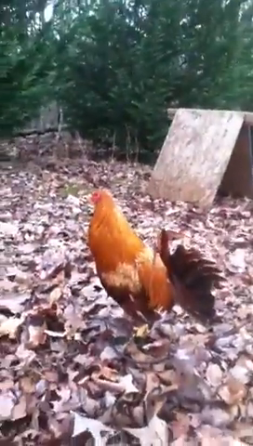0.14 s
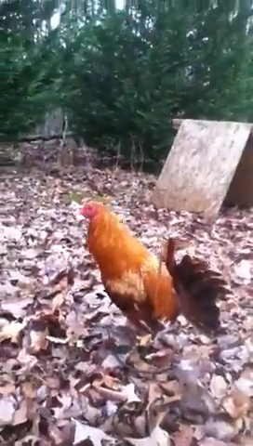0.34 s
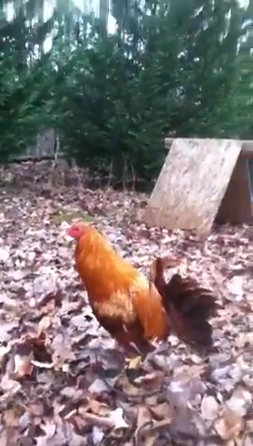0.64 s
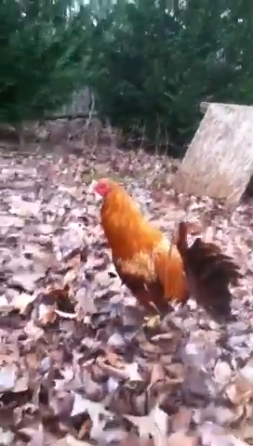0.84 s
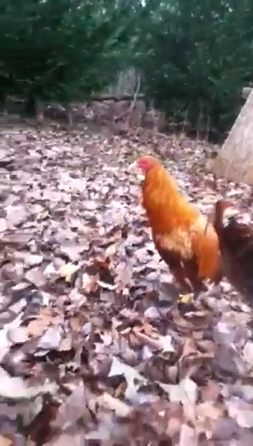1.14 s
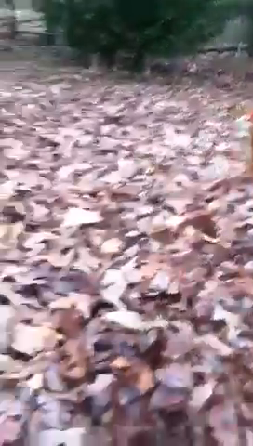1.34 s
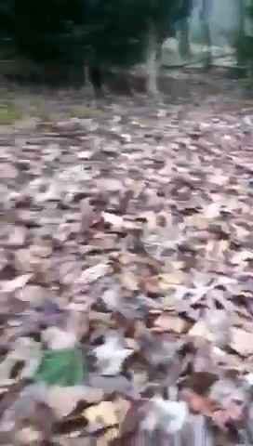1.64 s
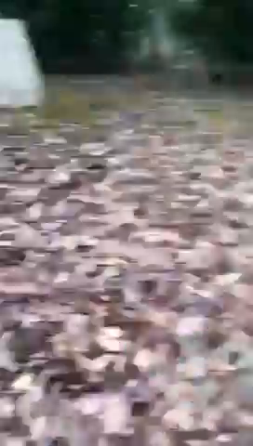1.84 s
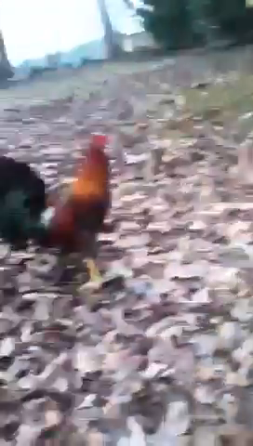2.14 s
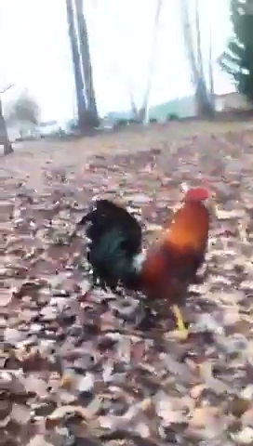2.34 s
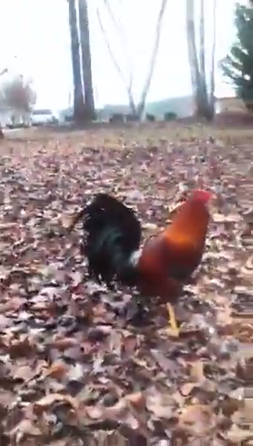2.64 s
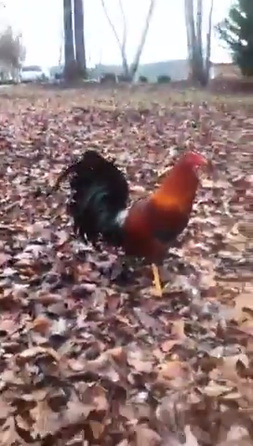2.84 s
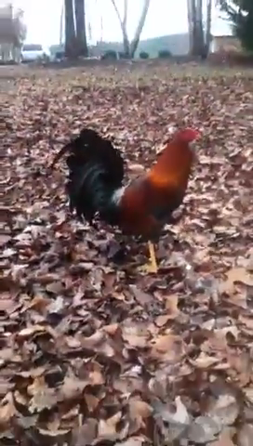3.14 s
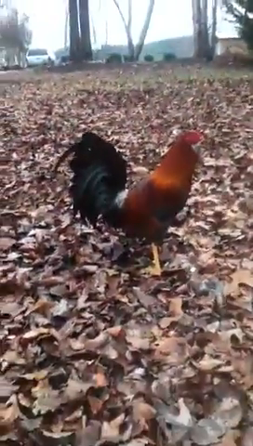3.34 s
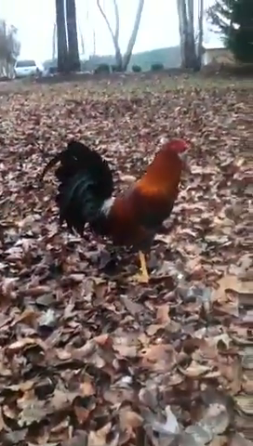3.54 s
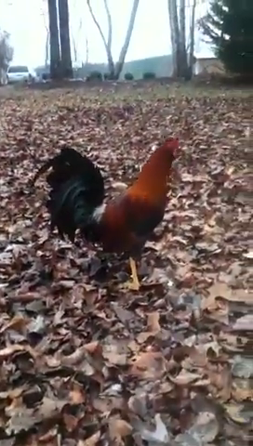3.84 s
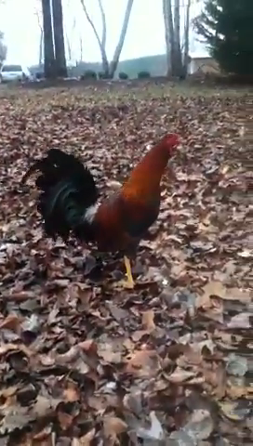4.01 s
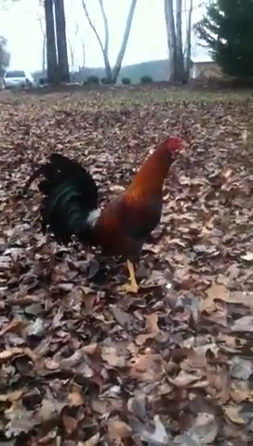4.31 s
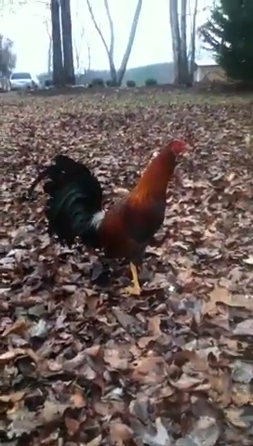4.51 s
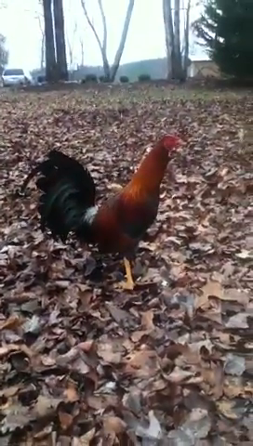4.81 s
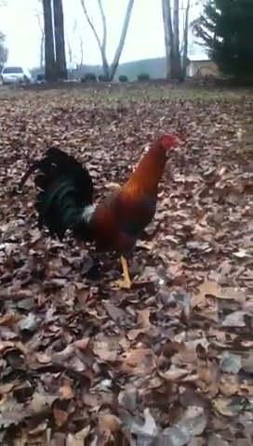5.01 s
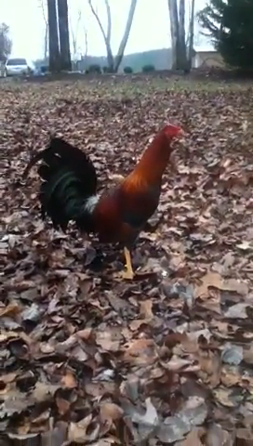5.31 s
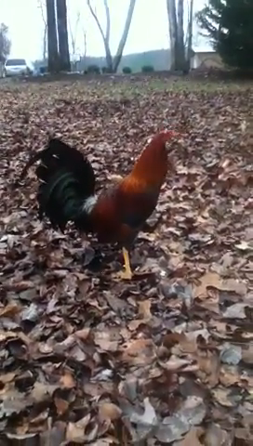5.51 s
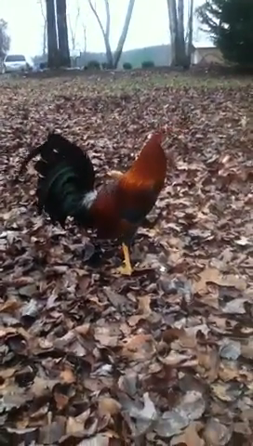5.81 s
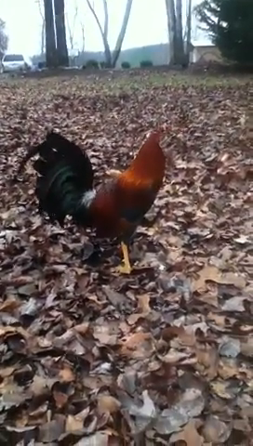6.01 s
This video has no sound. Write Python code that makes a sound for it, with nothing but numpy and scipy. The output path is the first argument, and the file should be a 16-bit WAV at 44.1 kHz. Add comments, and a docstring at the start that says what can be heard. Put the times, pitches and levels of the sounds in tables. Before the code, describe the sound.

A young rooster crows a single time, a couple of metres from a hand-held microphone in a leafy yard. Before the crow come soft, crackly shuffles in dry leaves and some brief handling bumps. The crow is loud and buzzy, four syllables that waver and crack, turning thin and hoarse in between. It leaves a slight echo among the trees over a faint outdoor rumble and hiss.

```python
"""A leafy yard: a young rooster crows once, in four syllables, a couple of metres from a hand-held phone.
His syrinx buzzes loudly, trembles and cracks; between syllables it drops to a thin, hoarse lower
register. Ground and trees return a faint echo. Before the crow, feet shuffle in dry leaves.
Fingers bump the phone now and then, over a low outdoor rumble."""
import sys
import numpy as np
from scipy import signal
from scipy.fft import rfft, irfft
from scipy.io import wavfile
from scipy.ndimage import uniform_filter1d, minimum_filter1d

SR = 44100
rng = np.random.default_rng(int(sys.argv[2]) if len(sys.argv) > 2 else 0)


def output_pcm(signal):
    """Save a mono or channel-first signal as 16-bit PCM at the path in sys.argv[1].

    Samples are clipped to [-1, 1] before scaling.
    """
    pcm = np.clip(np.atleast_2d(signal).T, -1, 1) * 32767
    wavfile.write(sys.argv[1], SR, np.round(pcm).astype(np.int16))


N = 271656
T = np.arange(N) / SR

# loud syllables: (start [s], end [s], top time [s], top pitch [Hz], end pitch [Hz], rise exponent,
#   fall exponent, relative level [dB], swell [dB], surge delay [s], surge [dB], harsh length [s],
#   harsh roughness [0-1], end roughness [0-1], harsh treble [dB], clear treble [dB],
#   clear beak opening [0-1], end beak opening [0-1], 2nd harmonic at start [dB], at end [dB])
SYLLABLES = [(3.754, 3.961, 3.82, 980, 842, 4, 1.5, -8, -.5, .004, 1.5, .118, .13, .33, 6, -5, .55, .3, -1, 0),
             (4.015, 4.136, 4.08, 1045, 855, 1.15, 1.7, -11.5, -2.5, .014, 5.5, .054, .55, .1, 3, 1, .2, .6, 5, -16),
             (4.226, 4.771, 4.53, 993, 880, 12, 1.9, -15, 4.5, .017, 11, .039, .75, .24, 6, 1, .05, .42, -.5, -2),
             (4.968, 5.135, 5.06, 894, 770, 8, 3.6, -18.5, 4, .003, 4, .006, .12, .02, -5, -5.5, .62, .78, 2.5, -4)]
# turbulent air in the throat: (frequency [Hz], density [dB])
RASP = [(200, -32.5), (480, -37.5), (750, 15), (1000, 13), (1450, -5), (2200, -0.5), (3200, -20.5),
        (3850, -13.5), (4400, -30.5), (5200, -28), (6500, -23), (9000, -26.5), (11000, -34.5), (13000, -47),
        (15000, -58.5)]


def undb(db):
    return 10 ** (np.asarray(db) / 20)


def unit(x):
    return x / np.sqrt(np.mean(x ** 2))


def at(spectrum, hz):
    """Read a (frequency [Hz], value) table on a log-frequency axis."""
    table_hz, value = np.transpose(spectrum)
    return np.interp(np.log(np.maximum(hz, 1)), np.log(table_hz), value)


def shape(x, spectrum):
    """Filter x by a (frequency [Hz], gain [dB]) curve."""
    return irfft(rfft(x) * undb(at(spectrum, np.fft.rfftfreq(N, 1 / SR))), N)


def colour(x, spectrum):
    """Filter x, then scale to rms 1."""
    return unit(shape(x, spectrum))


def noise():
    return rng.standard_normal(N)


def wander(rate_hz):
    """Smooth random drift up to about rate_hz; rms 1."""
    lowpass = np.exp(-.5 * (np.fft.rfftfreq(N, 1 / SR) / rate_hz) ** 2)
    return unit(irfft(rfft(noise()) * lowpass, N))


def bell(time_s, width_s):
    return np.exp(-.5 * ((T - time_s) / width_s) ** 2)


def gate(start_s, end_s, rise_s, fall_s):
    return (1 + np.tanh((T - start_s) / rise_s)) * (1 - np.tanh((T - end_s) / fall_s)) / 4


def phase_of(hz):
    return 2 * np.pi * np.cumsum(hz) / SR


def repeat_times(first_s, last_s, spacing_s, slowing=1):
    """Times of a run whose spacing grows by the factor slowing."""
    times = first_s + np.concatenate([[0], np.cumsum(spacing_s * slowing ** np.arange(12))])
    return times[times < last_s + spacing_s / 2]


def yard():
    """Distant low rumble that swells a little, under smooth hiss."""
    # outdoor background: (frequency [Hz], density [dB])
    background = [(15, -57.5), (25, -24), (108, -3), (317, -12.5), (363, -14), (641, -20.5), (695, -19),
                  (887, -18.5), (1290, -23.5), (2000, -25.5), (3720, -28), (5280, -28.5), (12500, -30.5),
                  (16000, -41.5)]
    air = colour(noise(), background)
    rumble = signal.sosfiltfilt(signal.butter(2, 500, fs=SR, output="sos"), air)
    hiss = air - rumble
    swell_db = .44 * wander(1.6) + .93 * wander(9) + 2 * bell(1.4, 1.4)
    return undb(-58.5) * (hiss + rumble * undb(swell_db))


def shuffling():
    """Crunch and hiss envelopes: leaves give way fast underfoot and settle slower, over a faint stir."""
    # foot shuffles: (time [s], length [s], crunch [dB], hiss [dB])
    shuffles = [(0.193, 0.012, -56, -65), (0.741, 0.03, -51.5, -56.5), (0.855, 0.11, -74, -61.5),
                (1.05, 0.04, -83, -58), (1.374, 0.13, -50, -57.5), (1.414, 0.019, -43.5, -67),
                (1.624, .14, -55.5, -59.5), (1.673, 0.02, -51.5, -69), (2.06, 0.17, -68.5, -64),
                (2.421, 0.024, -53, -55), (2.88, 0.17, -67, -81)]
    press_s, settle_s, stir_db = .008, .018, (-67.5, -66)
    power = np.outer(undb(stir_db) ** 2, gate(1.22, 3, rise_s=.25, fall_s=.25))
    for time_s, length_s, *levels_db in shuffles:
        press = (1 + np.tanh((T - time_s) / press_s)) / 2
        settle = np.exp(-np.maximum(T - time_s - length_s, 0) / settle_s)
        power = power + np.outer(undb(levels_db), press * settle) ** 2
    return np.sqrt(power)


def leaves():
    """Crushed leaves crackle in dense tiny snaps."""
    # dull crunch underfoot: (frequency [Hz], density [dB])
    crunch = [(150, -26), (300, 5.5), (500, 3.5), (950, 7), (1500, 4.5), (2200, -1.5), (3200, -22),
              (4900, -23), (6100, -11), (7500, -38), (9000, -38)]
    # crisp hiss on top: (frequency [Hz], density [dB])
    crisp = [(1500, -6), (3000, 2), (4900, -2), (6200, 0), (8000, -3.5), (12000, -9), (16000, -13.5)]
    snaps_per_s, out = 5000, 0
    for envelope, spectrum in zip(shuffling(), [crunch, crisp]):
        snaps = noise() * (rng.random(N) < snaps_per_s / SR)
        snaps *= undb(.29 * np.minimum(rng.exponential(size=N), 5))
        out = out + colour(snaps, spectrum) * envelope * undb(1.4 * wander(47))
    return out


def finger_bumps():
    """A contact tick, then a heavily damped thud of the phone case, falling in pitch."""
    # bumps: (time [s], thud [dB], start pitch [Hz], ring [s], tick [dB])
    bumps = [(0.8627, -11.5, 1300, 0.0019, -28), (1.178, -40.5, 1960, 0.0037, -53),
             (1.3875, -32.5, 1190, 0.004, -47), (2.171, -38.5, 1700, 0.0025, -53),
             (2.351, -43, 1400, .004, -56), (2.442, -37, 2870, 0.001, -56), (2.453, -38, 2490, 0.0022, -45),
             (4.032, -12, 1550, 0.00087, -42)]
    tick = colour(noise(), [(300, 1), (1500, -26), (3500, 4.5), (8000, -4),
                            (11000, -19.5), (15000, -32.5)])
    slowing_s, attack_s, tick_s = .0005, .00025, .00113
    out = 0
    for time_s, thud_db, hz, ring_s, tick_db in bumps:
        t = np.maximum(T - time_s, 0)
        phase = 2 * np.pi * hz * slowing_s * np.log1p(t / slowing_s)
        out = out - undb(thud_db) * np.sin(phase) * np.exp(-t / ring_s) * (1 - np.exp(-t / attack_s))
        out = out + undb(tick_db) * tick * (t > 0) * np.exp(-t / tick_s)
    return out


def echo(call, ground_db, ground_decay_s, trees_db, far_db, far_delay_s):
    """Leafy ground scatters the call at once, trunks return it late, the wood's far edge once more."""
    # echo from the trees: (frequency [Hz], gain [dB])
    tree_gain = [(400, -4.5), (900, -7), (1800, -3.5), (2700, 8.5), (3600, 1.5), (6000, -4.5), (12000, -17)]
    # its decay: (frequency [Hz], T60 [s])
    tree_t60 = [(400, .6), (900, 0.55), (1500, 1.7), (2100, 1.48), (2800, 0.91), (3600, 0.49), (6000, 0.64),
                (12000, .3)]
    ground = colour(noise(), [(500, -6), (900, 2), (3500, 9), (9000, -5)])
    ground *= np.exp(-T / ground_decay_s) * (T > .002)
    white, hz, trees = rfft(noise()), np.fft.rfftfreq(N, 1 / SR), 0
    for centre_hz in 350 * np.sqrt(2) ** np.arange(11):
        half_octave = np.abs(np.log2((hz + 1) / centre_hz)) < .25
        band = irfft(white * half_octave * undb(at(tree_gain, hz)), N)
        trees = trees + band * undb(-60 * T / at(tree_t60, centre_hz))
    trees *= (1 - np.exp(-T / .03)) * (1 + 4.5 * np.exp(-T / .0975))  # soft onset, strong early part
    far = colour(noise(), [(900, -16), (1800, 4), (2100, -9.5), (2800, -6.5), (5000, -31)])
    far *= bell(far_delay_s, .19)
    response = undb(ground_db) * unit(ground) + undb(trees_db) * unit(trees) + undb(far_db) * unit(far)
    return signal.fftconvolve(call, response / np.sqrt(N))[:N]


def hoarse_puffs():
    """Unpitched bursts where the voice gives out; one low gulp before the last syllable."""
    # puffs: (time [s], level [dB], width [s])
    puffs = [(4.785, -31.5, 0.017), (4.881, -24.5, 0.012), (4.925, -28.5, 0.006), (5.139, -32, 0.0052)]
    envelope = sum(undb(db) * bell(time_s, width_s) for time_s, db, width_s in puffs)
    bursts = envelope * colour(noise(), RASP)
    gulp = bell(4.878, .0071) * colour(noise(), [(150, -24), (270, 8), (420, -8), (700, -48)])
    return bursts + undb(-40) * gulp


def soft_register():
    """Soft voice's pitch, level and gate: it droops as the breath slackens, and finally slides away."""
    # break before each syllable:
    # (start pitch [Hz], end pitch [Hz], start level [dB], end level [dB], midway slack [dB])
    breaks = [(590, 640, -19.5, -15, 0), (625, 617, -17.5, -20, 4), (490, 690, -24.5, -19, 16.5),
              (631.4, 650, -23, -18, 18)]
    start_s, slide_s, droop_hz_per_db = 3.734, .024, 4.5
    progress = np.linspace(0, 1, 15)
    segments = []
    for (end_s, next_s, *_), (start_hz, end_hz, start_db, end_db, midway_db) in zip(SYLLABLES, breaks):
        slack_db = midway_db * np.sin(np.pi * progress)
        segments.append([start_s + (end_s - start_s) * progress,
                         start_hz + (end_hz - start_hz) * progress - droop_hz_per_db * slack_db,
                         start_db + (end_db - start_db) * progress - slack_db])
        start_s = next_s
    segments.append([(start_s, start_s + slide_s), (690.5, 409), (-19, -46.5)])  # closing slide
    sounding = sum(gate(times[0], times[-1], rise_s=.00051, fall_s=.0053) for times, _, _ in segments)
    times, hz, db = np.hstack(segments)
    return np.interp(T, times, hz), np.interp(T, times, db), sounding


def soft_voice():
    """Between syllables the membranes flap near 600 Hz; the throat lifts their second harmonic."""
    # throat response: (frequency [Hz], harmonic level [dB])
    throat = [(450, -29.5), (610, -15.5), (850, 4.5), (1220, 0), (1830, -7.5), (2450, -19.5), (3050, -17.5),
              (3700, -23.5), (4400, -38.5), (5200, -48.5), (6500, -42), (10000, -43.5), (13000, -76.5)]
    pitch_hz, level_db, sounding = soft_register()
    phase = phase_of(pitch_hz * (1 + .02 * wander(220)))
    voice = sum(undb(at(throat, k * pitch_hz) + 2 * wander(70)) * np.sin(k * phase)
                for k in range(1, 21))
    return sounding * undb(level_db) * (voice + undb(-13) * colour(noise(), RASP))


def syllable(start_s, end_s, top_s, top_hz, end_hz, rise, fall, base_db, swell_db,
             surge_s, surge_db, harsh_s, harsh_rough, end_rough, harsh_db, clear_db,
             open_clear, open_end, second_start_db, second_end_db):
    """Controls of one arch of pitch: it starts harsh with the beak wide, clears, and frays at its end."""
    # throat resonance under the 2nd harmonic: (frequency [Hz], level re fundamental [dB])
    resonance = [(1580, -23.5), (1700, -9.5), (1770, -4.5), (1850, -1.5), (1980, -1.5), (2080, -9.5)]
    onset_hz, climb_hz_per_s = 809.5, 100
    t = np.clip(T, start_s, end_s)
    progress = (t - start_s) / (end_s - start_s)
    crest_hz = top_hz - climb_hz_per_s * np.maximum(top_s - t, 0)
    scoop_hz = (crest_hz - onset_hz) * np.clip((top_s - t) / (top_s - start_s), 0, 1) ** rise
    drop_hz = (top_hz - end_hz) * np.clip((t - top_s) / (end_s - top_s), 0, 1) ** fall
    pitch_hz = crest_hz - scoop_hz - drop_hz

    surge = bell(start_s + surge_s, .0069)  # push of breath
    surge_tilt_db = -6.5 * surge  # favours the fundamental
    harsh = (1 - np.tanh((t - start_s - harsh_s) / .005)) / 2
    fray = end_rough * np.exp((progress - 1) / .19)
    dull_onset = np.exp((start_s - t) / (.23 * harsh_s)) * (1 - harsh_rough)

    level_db = base_db + swell_db * progress + surge_db * surge - 18 * fray
    rough = harsh_rough * harsh * (1 - .63 * surge) + fray
    second_db = second_start_db + (second_end_db - second_start_db) * progress ** 2.5
    second_db += at(resonance, 2 * pitch_hz) - 12.5 * rough + surge_tilt_db
    treble_db = harsh_db * harsh + clear_db * (1 - harsh) - 16 * dull_onset + surge_tilt_db + 6 * fray
    opening = .79 * harsh + (open_clear + (open_end - open_clear) * progress ** 1.9) * (1 - harsh)
    return np.array([pitch_hz, level_db, second_db, rough, treble_db, opening])


def crow_controls():
    """Join the syllables' controls, switching midway through each gap."""
    controls = syllable(*SYLLABLES[0])
    for before, row in zip(SYLLABLES, SYLLABLES[1:]):
        controls = np.where(T > (before[1] + row[0]) / 2, syllable(*row), controls)
    return controls


def tremor():
    """Brief pitch sags [Hz] in bouts that slow down, each deepest in its middle."""
    # bouts: (first [s], last [s], first spacing [s], depth [Hz])
    bouts = [(4.304, 4.372, .0195, 42.3), (4.519, 4.724, .0292, 67.35)]
    sag_hz = 0
    for first_s, last_s, spacing_s, depth_hz in bouts:
        times = repeat_times(first_s, last_s, spacing_s, slowing=1.06)
        for time_s, arch in zip(times, np.sin(np.linspace(0, np.pi, len(times)))):
            sag_hz = sag_hz + depth_hz * (.6 + .4 * arch) * bell(time_s, .14 * spacing_s)
    return sag_hz


def voice_cracks():
    """Depth of the dips where the membranes lose step for a few cycles."""
    # runs of cracks: (first [s], last [s], spacing [s], depth [0-1])
    runs = [(3.764, 3.84, 0.019, 0.47), (3.945, 3.944, .02, 0.65), (4.026, 4.055, .015, .42),
            (4.252, 4.254, .02, 0.33), (4.654, 4.61, 0.044, .5)]
    dips = sum(depth * bell(time_s, .0034) for *run, depth in runs for time_s in repeat_times(*run))
    return np.clip(dips, 0, .95)


def loud_voice():
    """The syrinx buzzes near 950 Hz; strain makes cycles uneven and lets air rasp through once a cycle."""
    # upper harmonics, beak narrow: (frequency [Hz], level re fundamental [dB])
    throat = [(1500, -43), (2400, -25), (2950, -32.5), (3250, -25.5), (3600, -20.5), (3950, -30),
              (4300, -46), (4850, -45), (5250, -58), (5800, -54), (6900, -49.5), (7400, -52), (8900, -47),
              (10700, -53), (12200, -78), (15000, -77)]
    # resonances added by a wide beak: (frequency [Hz], level re fundamental [dB])
    wide_beak = [(1500, -36), (2300, -23), (2800, -13.5), (3250, -37.5), (4300, -51), (5200, -60),
                 (5800, -31.5), (6750, -25), (7300, -54), (7850, -40), (8900, -46), (11000, -56),
                 (13000, -83.5)]
    pitch_hz, level_db, second_db, rough, treble_db, opening = crow_controls()
    crack, sag_hz = voice_cracks(), tremor()
    rough = np.clip(rough + .7 * crack, 0, 1.2) + .56 * sag_hz / pitch_hz
    pitch_hz = pitch_hz * (1 - .05 * crack) - sag_hz + 2 * wander(44)
    phase = phase_of(pitch_hz * (1 + .05 * rough * wander(260)))
    core = np.sin(phase) + undb(second_db) * np.sin(2 * phase)
    flicker_db = 2.5 + 1.5 * np.minimum(rough, .4)
    buzz = 0
    for k in range(3, 17):
        blur_rad = np.minimum(1.2 * k * rough, 1.5) * wander(150)  # high harmonics smear first
        buzz = buzz + undb(flicker_db * wander(52)) * np.sin(k * phase + blur_rad)
    overtones = undb(treble_db) * shape(buzz, throat)
    overtones += opening ** 2 * undb(.5 * treble_db) * shape(buzz, wide_beak)
    voice = (core + overtones) * (1 - crack) * (1 + .23 * rough * wander(200))
    air = undb(-3.5) * rough ** 1.45 * colour(noise() * (1 + 1.5 * np.cos(phase)), RASP)
    sounding = sum(gate(start_s, end_s, rise_s=.0017, fall_s=.003) for start_s, end_s, *_ in SYLLABLES)
    return sounding * undb(level_db + 3.5) * (voice + air)


def scene():
    """Rooster, echo and yard sounds, in mono."""
    # the small beak radiates little bass: (frequency [Hz], gain [dB])
    beak = [(100, -41.5), (300, -12.5), (620, 0)]
    rooster = shape(loud_voice() + soft_voice(), beak) + hoarse_puffs()
    reflections = echo(rooster, ground_db=-18.5, ground_decay_s=.031, trees_db=-26.5,
                       far_db=-60.5, far_delay_s=.68)
    return (rooster + reflections + leaves() + finger_bumps() + yard())[None]


def record(dry):
    """The phone drops the deepest bass, limits peaks fast and cuts the top."""
    low_hz, top_hz, ceiling, window_samples = 30, 15800, .72, 221
    thinned = signal.sosfilt(signal.butter(2, low_hz, "highpass", fs=SR, output="sos"), dry)
    gain = ceiling / np.maximum(np.abs(thinned), ceiling)
    gain = uniform_filter1d(minimum_filter1d(gain, window_samples), window_samples)
    return signal.sosfilt(signal.ellip(10, .2, 80, top_hz, fs=SR, output="sos"), thinned * gain)


dry = scene()
out = record(dry)
output_pcm(out)
```